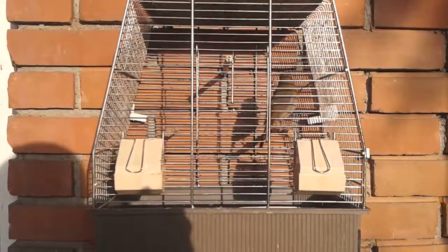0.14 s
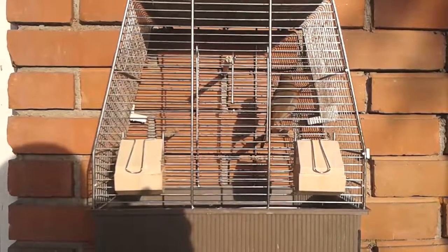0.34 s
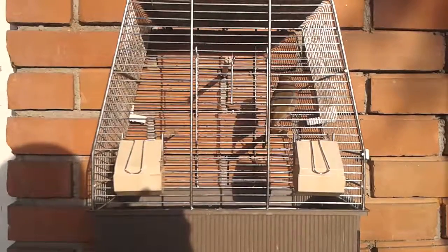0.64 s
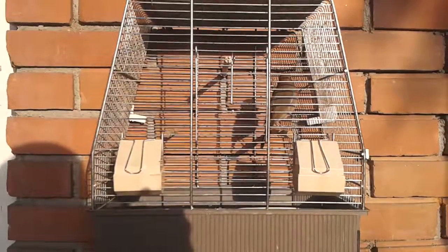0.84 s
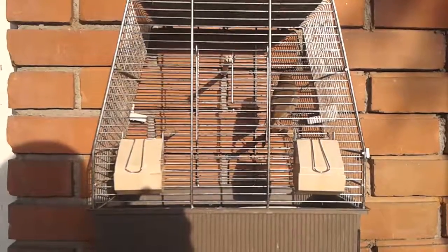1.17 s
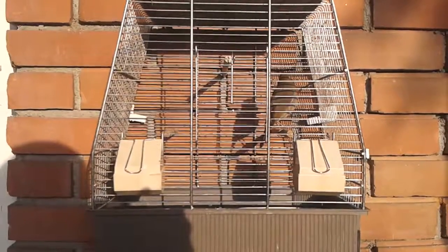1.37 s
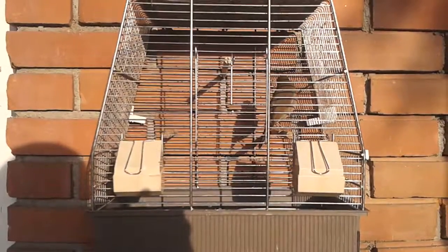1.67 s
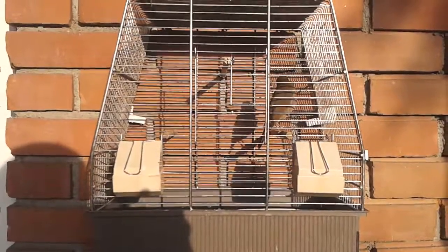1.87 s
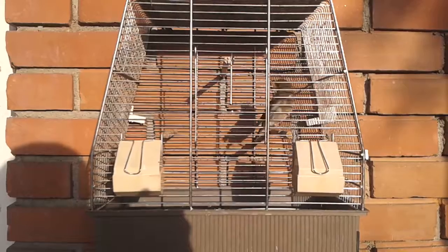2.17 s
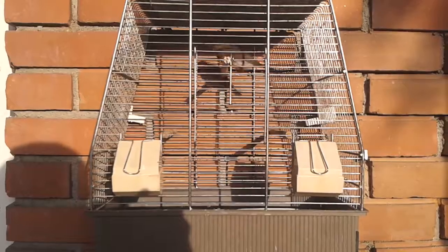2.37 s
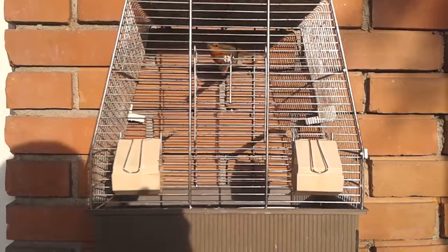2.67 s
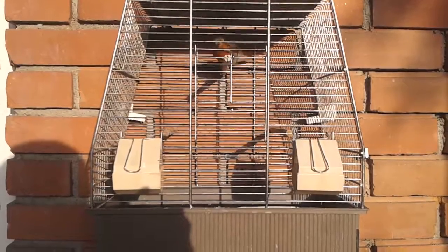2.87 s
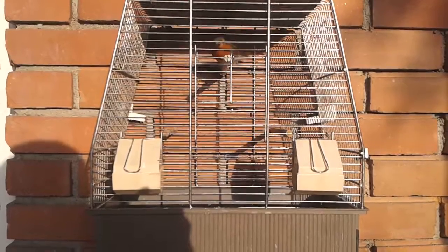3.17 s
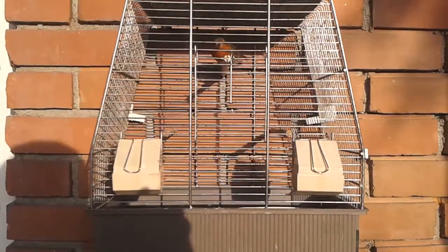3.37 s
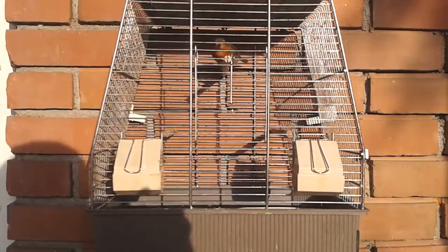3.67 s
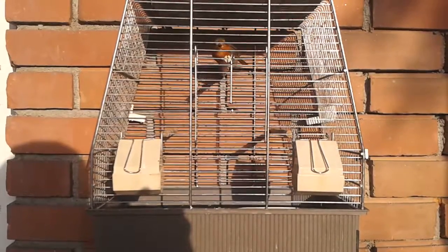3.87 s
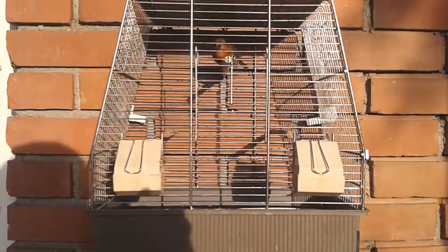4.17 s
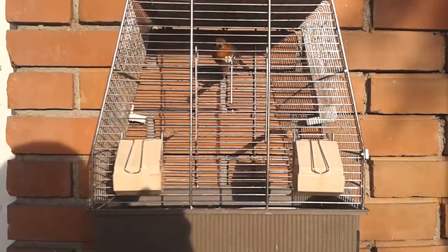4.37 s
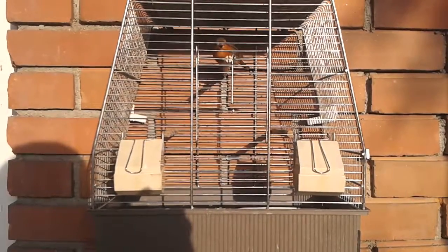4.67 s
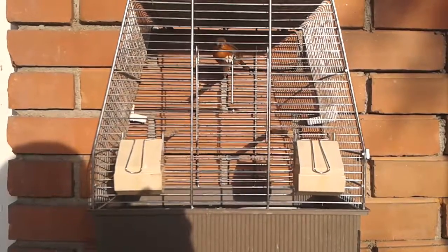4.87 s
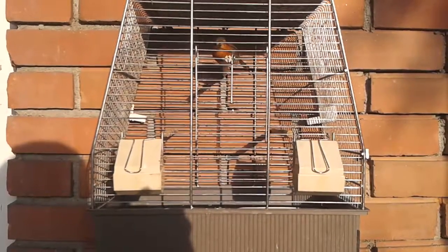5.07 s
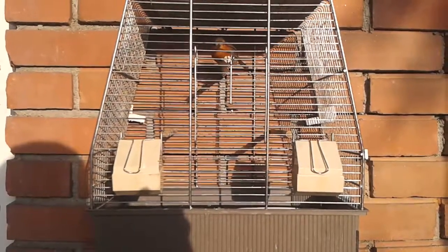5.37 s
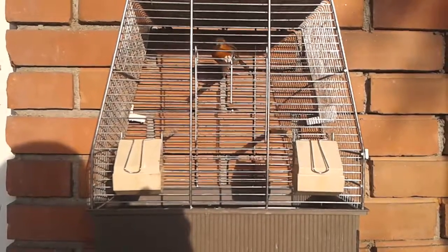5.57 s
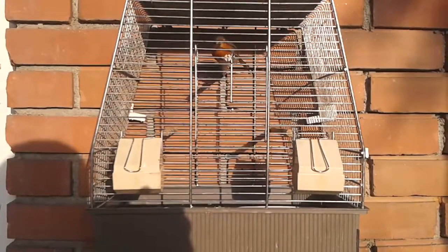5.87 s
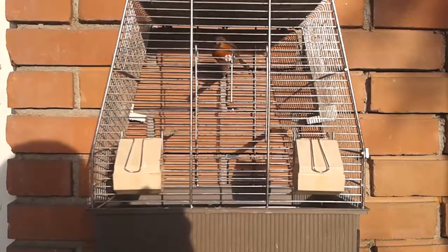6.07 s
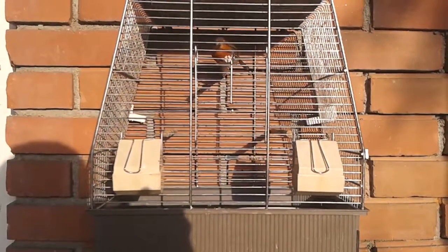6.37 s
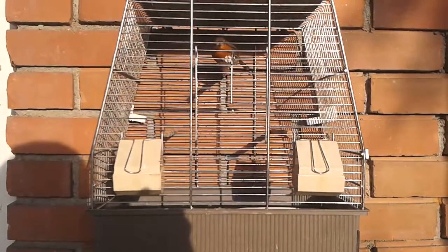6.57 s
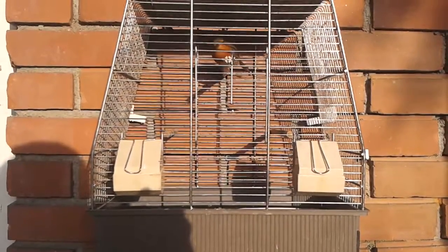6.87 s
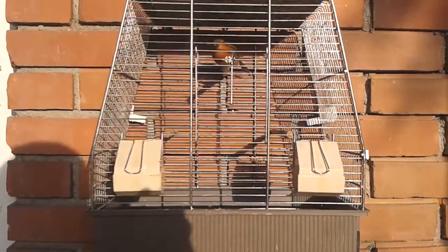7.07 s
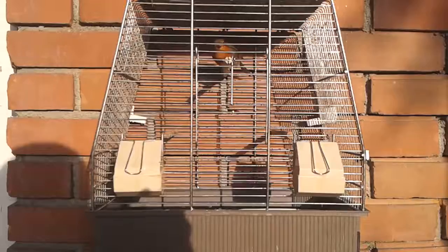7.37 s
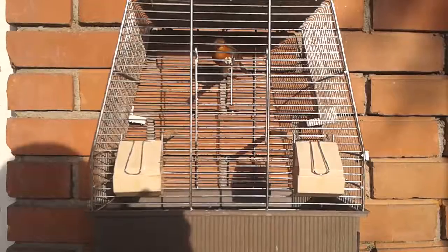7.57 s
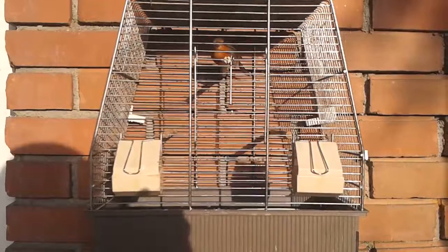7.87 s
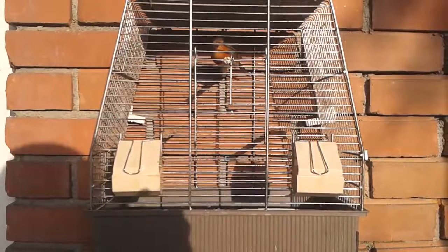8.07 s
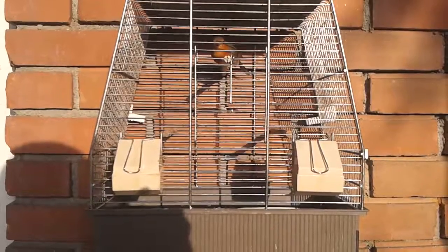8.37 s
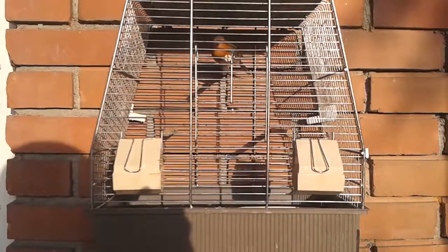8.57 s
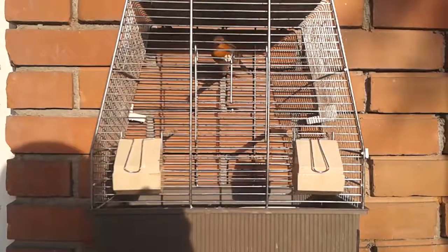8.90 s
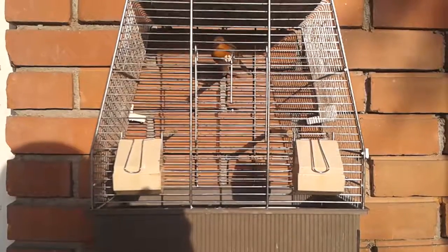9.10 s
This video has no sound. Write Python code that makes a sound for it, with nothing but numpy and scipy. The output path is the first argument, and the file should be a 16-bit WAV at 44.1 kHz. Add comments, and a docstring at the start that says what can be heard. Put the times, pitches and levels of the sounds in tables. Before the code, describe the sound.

A caged robin sings close to the microphone in a brick-walled yard. From 0 to 1.3 s it pours out rapid flicked chips, gliding slurs, a thin high arch around 0.6 s and bright barks near 0.8 s, then trails off softly. A pause follows, with dull distant traffic, a faint wavering engine drone and far, echo-blurred bird whistles around 1.6 and 2.5 s. At 3.1 s a very thin high whistle leads to the second phrase, 3.6 to 5 s: loud rasping barks, slightly overloaded, rough upward whips, a long falling whistle and a quiet dip. The far bird answers faintly at 5.3 and 6.4 s. Another thin lead-in at 6.9 s opens the last phrase: brisk chips and double notes from 7.3 s, then winding two-voiced whistles from 8.3 s, ending on a rising note about 9.2 s. A weak two-tone car horn sounds far off from 8.9 s.

```python
"""A robin in a wire cage on a brick wall sings three phrases close to the microphone, two led in by a
thin high whistle. The two sides of its syrinx make gliding whistles, often overlapping: chips, barks,
whips, slurs and long notes. Wall and yard throw them back, and the loudest overload the input.
Behind it another bird whistles through a blur of echoes, and filtered noise makes distant traffic.
A droning engine, low hums and, at the end, a far two-tone car horn are sums of wavering tones."""
import sys
import numpy as np
from scipy import signal
from scipy.fft import rfft, irfft
from scipy.io import wavfile

SR = 44100
rng = np.random.default_rng(int(sys.argv[2]) if len(sys.argv) > 2 else 0)


def transcribe(signal):
    """Save signal, clipped to [-1, 1], as a 16-bit WAV file at the path in sys.argv[1]."""
    frames = np.atleast_2d(signal).T
    limited = np.clip(frames, -1, 1)
    pcm = np.round(limited * 32767).astype(np.int16)
    wavfile.write(sys.argv[1], SR, pcm)


N = 407484
TIME = np.arange(N) / SR
TOP_HZ = 16000

# What the throat lets out of an overtone. Each row: overtone pitch in Hz, level against the note in dB.
THROAT_LEVELS = [(5000, -17.5), (6300, -32), (7400, -43), (10000, -44.5), (12500, -46), (16000, -53.5)]
# Flicks, a soft foot that hooks upward through a sharp peak. Each row: start in seconds, time to the
# peak in seconds, pitch in Hz, pitch at the peak in Hz, peak level in dB.
FLICK_NOTES = [(0.125, 0.014, 3350, 3717, -5), (.294, .012, 3307, 3686, -13),
               (.367, 0.015, 3283, 3900, -7.5), (.426, 0.013, 3510, 3607, -8.5),
               (.493, 0.014, 3234, 3860, -6), (1.195, 0.018, 3090, 3670, -25.5),
               (3.617, 0.014, 3112, 3388, -19.5), (8.096, 0.014, 3200, 3610, -11),
               (8.713, .013, 3170, 3300, -30)]
# Scoops, the U-shaped chips of the last phrase. Each row: start in seconds, length in seconds,
# pitch near the lowest point in Hz, middle level in dB, swell in dB (below zero it sags).
SCOOP_NOTES = [(7.331, 0.019, 3593, -11.5, 6.5), (7.475, 0.013, 3345, -11, 8),
               (7.535, 0.016, 3312, -12, -14), (7.595, 0.013, 3370, -5.5, 8.5),
               (7.666, 0.012, 3360, -14.5, -5), (7.747, 0.018, 3306, -9, -3.5),
               (7.811, 0.01, 3330, -6.5, 19), (7.877, 0.015, 3370, -9.5, -10.5),
               (7.937, 0.013, 3450, -5.5, 3), (8.032, 0.013, 3350, -10.5, -8.5),
               (8.185, 0.015, 3210, -24, 8)]
# Strokes, a quick drop onto a pitch. Each row: start in seconds, length in seconds,
# landing pitch in Hz, middle level in dB, swell in dB.
STROKE_NOTES = [(.06, .011, 3450, -7.5, 20), (.754, .011, 5380, -18.5, 0.5), (.774, .01, 4900, -8, 13),
                (.828, 0.014, 4930, -16, 16), (1.064, .007, 3180, -31, 17), (4.084, 0.0061, 3476, -7, 6),
                (4.092, 0.0035, 3110, -6, -19), (4.17, .008, 4150, -18.5, 13),
                (4.183, .011, 3700, -11.5, 24), (4.197, 0.012, 3370, -13, 16),
                (4.783, .011, 3230, -16.5, 5)]
# Barks, a clean head that breaks into a sagging rasp. Each row: start in seconds, head in seconds,
# tail in seconds, first pitch in Hz, pitch at the break in Hz, last pitch in Hz, peak level in dB,
# swell of the head in dB.
BARK_NOTES = [(0, 0.0015, 0.025, 3850, 3794, 3540, -10, 6), (.783, .018, 0.0086, 5000, 5290, 4940, -2.5, 7),
              (0.839, 0.012, 0.0077, 5170, 5250, 4830, -2.5, 4.5),
              (3.666, 0.011, 0.024, 3327, 3770, 3546, -5, 11),
              (3.748, 0.022, 0.022, 3455, 3810, 3550, 1, 11), (3.848, .019, 0.032, 3837, 4022, 3470, 0, 6),
              (3.958, 0.014, .015, 3716, 3804, 3360, 0, 0.5),
              (4.298, 0.006, 0.033, 3910, 3734, 3425, -2, 3.5)]
# Whips, a rough leap to a high note that fades.
# Each row: start in seconds, length in seconds, level of the leap in dB.
WHIP_NOTES = [(4.412, 0.058, -6.5), (4.538, 0.04, -14.5), (4.596, 0.059, -15)]
# Chords, one side sings and the other joins above it. Each row: start in seconds, length of the low
# note in seconds, low pitch in Hz, its peak level in dB, high pitch in Hz, its peak level in dB.
CHORD_NOTES = [(7.374, 0.015, 3733, -6.5, 5070, -18), (7.416, 0.035, 4450, -6.5, 5760, -26),
               (7.692, 0.026, 4395, -4.5, 5730, -16), (7.972, 0.024, 4233, -6.5, 5236, -16)]
# Slurs, easing from one pitch to another. Each row: start in seconds, length in seconds,
# first pitch in Hz, last pitch in Hz, middle level in dB, swell in dB, rasp from 0 to 1.
SLUR_NOTES = [(0.065, 0.097, 3198, 3080, -20, -12.5, 0.1), (.138, 0.081, 3390, 2900, -21, -7, 0.23),
              (0.157, 0.0256, 6320, 5940, -35.5, -2.5, 0.06), (.2, .011, 3620, 3800, -20, 3, .5),
              (.214, .018, 3760, 3250, -18, -3, .7), (0.242, 0.043, 3000, 2417, -24.5, 6, 0.02),
              (.385, .029, 3755, 3954, -18, 11.5, 0.51), (.593, 0.042, 4300, 5046, -30, -5.5, 0.6),
              (0.692, 0.037, 8530, 7630, -37.5, 22, 1), (0.704, .016, 7300, 5300, -19.5, -6.5, 0.9),
              (0.717, .02, 5340, 3780, -29.5, 0.5, .6), (0.731, .024, 6430, 7100, -24.5, -2.5, 0.2),
              (.922, 0.059, 5700, 6310, -25, -15, 0.06), (1.069, .014, 3110, 3220, -32.5, -7, .4),
              (1.082, .031, 3240, 3190, -25, -8, .05), (1.109, .015, 3680, 3680, -29.5, 9, .6),
              (1.14, .032, 3220, 3130, -36.5, -3, .5), (1.166, .021, 3650, 3880, -32.5, -4, .2),
              (1.243, .021, 2580, 2450, -38.5, -6, .2), (1.258, .027, 2990, 3350, -33, 6, .7),
              (1.266, .04, 2616, 2720, -40, 0, .6), (1.304, .011, 2760, 2420, -42, -4, .2),
              (3.562, 0.08, 2420, 2900, -40.5, 10, 0.42), (3.574, .016, 3200, 3650, -22, 19.5, .03),
              (3.585, .017, 3600, 3800, -13.5, -4.5, .05), (4.07, 0.027, 4550, 6030, -31.5, -15, 1),
              (4.076, 0.043, 2690, 2580, -35, -10.5, 1), (4.176, 0.021, 4200, 6900, -32, -19.5, 0.7),
              (4.176, 0.019, 1860, 3480, -31, 18.5, 1), (4.267, .026, 4220, 4550, -20, 14, .6),
              (4.277, .035, 5010, 4400, -27.5, -3.5, .9), (4.288, .016, 4435, 3950, -14.5, 7, .6),
              (4.653, 0.062, 5115, 4698, -12, 10, 0.22), (4.717, 0.076, 4683, 4746, -29.5, -20, 0),
              (7.323, 0.0074, 3340, 4200, -21.5, 4, 0.1), (7.53, 0.011, 4730, 5120, -11, -1.5, 0.05),
              (7.581, 0.017, 2380, 2560, -39, 19.5, 1), (7.653, .025, 4540, 4960, -10, -4, .11),
              (7.71, .02, 4250, 4350, -17, 25, 0.83), (7.849, 0.017, 2470, 2360, -36, 3.5, 1),
              (8.566, 0.058, 4040, 3860, -37.5, 32.5, .07), (8.734, 0.035, 3790, 3925, -26, -10, .07),
              (8.771, 0.017, 3410, 3330, -26.5, -12.5, 0.1), (8.846, 0.03, 3840, 6230, -34.5, -2, .6),
              (8.852, 0.042, 2404, 3730, -25.5, 25.5, 0.8), (9.014, 0.033, 2895, 3898, -14, 21, 0.47),
              (9.055, 0.045, 5110, 5240, -26, -14.5, 0.12)]
# Long whistles. Each row of a curve: time in seconds, pitch in Hz, level in dB before the shared boost.
# Lead-ins, upper voice and lower voice hold two curves each; the others are one curve.
HIGH_ARCH_CURVE = [(0.603, 7400, -42), (0.617, 7570, -35), (0.629, 8160, -38.5), (0.639, 7750, -37.5),
                   (0.649, 7580, -27.5), (0.681, 7560, -27), (0.7, 7020, -34)]
LEAD_IN_CURVES = [
    [(3.14, 8490, -58), (3.15, 8530, -43.5), (3.24, 8530, -58.5), (3.292, 7940, -44), (3.31, 8230, -72),
     (3.39, 8030, -52)],
    [(6.865, 8030, -52), (6.941, 8180, -48.5), (7.045, 7880, -50.5), (7.057, 7880, -42.5),
     (7.167, 8100, -51), (7.195, 7840, -51.5)],
]
CLOSING_DIP_CURVE = [(4.795, 3220, -27), (4.85, 3070, -38.5), (4.896, 3295, -38.5), (4.921, 3346, -25.5),
                     (4.956, 3480, -30.5)]
UPPER_VOICE_CURVES = [
    [(8.32, 4020, -30), (8.338, 3990, -25), (8.354, 3960, -29.5), (8.404, 4300, -31), (8.454, 4140, -32),
     (8.472, 3964, -20), (8.535, 4060, -23)],
    [(8.885, 3810, -25.5), (8.927, 4000, -20.5), (8.937, 4385, -27), (8.943, 4330, -20.5),
     (8.953, 3830, -30), (8.967, 4135, -25.5), (8.97, 4030, -23)],
]
LOWER_VOICE_CURVES = [
    [(8.322, 2475, -36.5), (8.364, 2557, -42.5), (8.398, 2434, -51.5), (8.428, 2490, -42),
     (8.45, 2550, -49)],
    [(8.54, 2440, -40.5), (8.57, 2670, -49.5), (8.582, 2473, -38.5), (8.624, 2597, -50.5),
     (8.635, 2640, -32)],
]
LAST_RISE_CURVE = [(9.155, 3224, -26.5), (9.181, 3918, -26), (9.211, 3874, -27.5), (9.24, 3810, -20)]
# Nearby surfaces that reflect the song. Each row: delay in seconds, level in dB.
NEAR_REFLECTIONS = [(.0017, -20), (.0046, -13), (.0093, -14.5)]
# The far bird's loose calls, falling and levelling off. Each row: start in seconds, length in seconds,
# first pitch in Hz, last pitch in Hz, level in dB before trim and echoes.
FAR_CALLS = [(1.621, .14, 3400, 2520, -63), (2.751, 0.17, 4340, 2490, -64), (3.19, 0.17, 3300, 2390, -58),
             (3.21, .08, 4700, 4330, -59), (5.265, 0.064, 5290, 4500, -58),
             (5.377, 0.07, 5500, 2890, -55.5), (6.899, .19, 3470, 2430, -61)]
# The far bird's song, sung twice. Each row: start in seconds, level in dB before trim and echoes.
FAR_SONG_STARTS = [(2.492, -51.5), (6.361, -51)]
# Quick notes of that song. Each row: delay in seconds, first pitch in Hz, last pitch in Hz,
# level against the song in dB.
FAR_SONG_NOTES = [(0, 3770, 4900, -2), (.03, 5100, 4100, -4), (.055, 4260, 3280, -2.5),
                  (0.079, 3210, 4200, 0.5), (.112, 4300, 3300, -1), (0.147, 3280, 4180, 3)]
# Car horn, one row for each of its two tones. Each row: pitch in Hz, then the levels of the first
# seven harmonics in dB before the fading.
HORN_TONES = [(346, -56, -57, -62.5, -70.5, -71.5, -67, -70), (448, -49, -63, -67.5, -72, -66, -62, -57)]
# Loudness of the whole horn over time. Each row: time in seconds, change in level in dB.
HORN_FADER = [(8.9, -49), (8.94, -1.5), (9.0, 7), (9.07, 4), (9.12, -0.5), (9.24, -4.5)]
# Far engine. Each row: time in seconds, pitch of its strongest line in Hz, level in dB before trim.
ENGINE_COURSE = [(0, 156, -75.5), (1.85, 164, -64), (2.1, 166.4, -60), (3.1, 172.8, -54), (3.6, 171, -69),
                 (4.1, 178.5, -57.5), (5.1, 173.6, -58), (6.9, 179.9, -68), (7.35, 180.5, -58),
                 (7.75, 180.6, -64), (8.15, 177.6, -54.5), (9.2, 181.7, -67)]
# Its lines; the strongest is the third multiple. Each row: multiple of the firing rate, level in dB.
ENGINE_HARMONICS = [(1, -14.5), (3, 1), (4, -10.5), (5, -9.5)]
# Faint low hums. Each row: start in seconds, length in seconds, pitch in Hz, level in dB.
HUM_TONES = [(1.054, 1.09, 79.4, -65.5), (2.001, 1.43, 249, -61.5), (4.6, 2.25, 58.07, -66)]
# Tone colour of distant traffic. Each row: frequency in Hz, relative level per Hz in dB.
TRAFFIC_COLOUR = [(22, -32.5), (60, -10.5), (110, -15), (230, -9.5), (380, -14.5), (650, -15.5),
                  (1400, -19.5), (1700, -20), (2700, -28.5), (6200, -37), (16000, -42)]
# Level of the background noise's middle range, higher while the robin sings.
# Each row: time in seconds, level in dB.
BACKGROUND_COURSE = [(0, -56.5), (.9, -56), (1.5, -63), (2.7, -58), (3.4, -60), (4.3, -53.5), (5.2, -62),
                     (7.1, -60), (7.6, -53.5), (9.2, -59)]


def undb(db):
    """Decibels to gain."""
    return 10 ** (np.asarray(db) / 20)


def unit(x):
    """Scale to rms 1."""
    return x / np.sqrt(np.mean(x ** 2))


def curves(rows):
    """The columns of a table that starts with time, joined by straight lines."""
    s, *columns = np.transpose(rows)
    return [np.interp(TIME, s, column) for column in columns]


def band(x, lo_hz, hi_hz, order=2):
    """Keep the frequencies between two limits."""
    limits = [lo_hz, min(hi_hz, SR / 2 - 100)]
    return signal.sosfilt(signal.butter(order, limits, "band", fs=SR, output="sos"), x)


def wander(rate_hz):
    """Smooth random motion of spread 1, mostly slower than the given rate."""
    hz = np.arange(N // 2 + 1) * SR / N
    spectrum = rfft(rng.standard_normal(N))
    return unit(irfft(spectrum * np.exp(-(hz / rate_hz) ** 2), N))


def turns(hz):
    """Add up a changing pitch into the phase of a tone."""
    return 2 * np.pi * np.cumsum(hz) / SR


def add(out, start_s, sound):
    """Mix a sound in at a given time."""
    i = max(int(start_s * SR), 0)
    out[i:i + len(sound)] += sound[:max(N - i, 0)]


def progress(length_s):
    """Runs from 0 to 1 over a note."""
    return np.linspace(0, 1, max(int(length_s * SR), 2))


def ease(length_s, from_hz, to_hz, time_constants=2.3):
    """A pitch that moves fast at first and slows toward its goal."""
    share = np.expm1(-time_constants * progress(length_s)) / np.expm1(-time_constants)
    return from_hz + (to_hz - from_hz) * share


def glide(length_s, pitch_hz, shape):
    """A smooth bend through three ratios of a pitch: start, middle and end."""
    bend = np.polyfit([0, .5, 1], shape, 2)
    return pitch_hz * np.polyval(bend, progress(length_s))


def swell(length_s, db, swell_db):
    """A level in dB that changes evenly through its middle value."""
    return db + swell_db * (progress(length_s) - .5)


def robin(ramp_s=0.0023, ramp_share=0.063, waver=0.0028, rasp_pitch=.045, rasp_db=2.0, hiss_db=-34,
          octave_db=-37, gape_hz=(4915, 5600), beat_hz=290, beat_spread=0.22, strand_db=-6):
    """Nearly pure whistles glide; rasp shakes them, adds a beating strand and lets air hiss through."""
    out = np.zeros(N)
    drift, shake, flutter = wander(150), wander(440), wander(240)
    air = unit(band(rng.standard_normal(N), 2500, TOP_HZ))
    beat = turns(beat_hz * (1 + beat_spread * wander(60)))
    throat_hz, throat_db = np.transpose(THROAT_LEVELS)
    for start, hz, db, rasp in [*chips(), *barks(), *whips(), *chords(), *slurs(), *whistles()]:
        u = np.linspace(0, 1, len(hz))
        at = np.minimum(max(int(start * SR), 0) + np.arange(len(u)), N - 1)
        hz = hz * (1 + waver * drift[at] + rasp * rasp_pitch * shake[at])
        phase = turns(hz)
        # the air valve opens and shuts smoothly, while the pressure swells or sags through the note
        ramp = min(ramp_s * SR / len(u) + ramp_share, .5)
        valve = np.sin(np.pi / 2 * np.minimum(np.minimum(u, 1 - u) / ramp, 1)) ** 2
        pressure = undb(db + rasp * rasp_db * flutter[at])
        overtones = 0
        for k in range(2, 5):
            if k * np.median(hz) < SR / 2:
                overtones = overtones + undb(np.interp(k * hz, throat_hz, throat_db)) * np.sin(k * phase)
        # the beak gapes on high notes and lets more of the octave out
        gape = np.interp(hz, gape_hz, [0, 1])
        overtones = overtones + undb(octave_db) * gape * np.sin(2 * phase)
        # in a harsh note the two sides fall out of step and a second strand sounds just below
        strand = undb(strand_db) * np.sin(phase - beat[at])
        harshness = rasp ** 2 * (strand + undb(hiss_db) * air[at])
        add(out, start, valve * pressure * (np.sin(phase) + overtones + harshness))
    return out


def chips(foot_db=13.5, peak_s=0.0026, hook_s=.004, overshoot_s=0.0033, flick_rasp=0.55):
    """Flicks, scoops and strokes, one quick bend each, as (start s, pitch Hz, level dB, rasp)."""
    for start, rise, hz, peak_hz, db in FLICK_NOTES:
        length = rise + overshoot_s
        t = length * progress(length) - rise  # zero at the peak
        hook = np.exp(t / hook_s)
        peak = 1 / (1 + (t / peak_s) ** 2)
        yield start, hz + (peak_hz - hz) * hook, db - foot_db * (1 - peak), flick_rasp
    scoops = SCOOP_NOTES, (1.1, 0.99, 1.19), 0.087  # notes, pitch ratios, rasp
    strokes = STROKE_NOTES, (1.437, 1.1, 1), 0.38
    for rows, shape, rasp in (scoops, strokes):
        for start, length, hz, db, swell_db in rows:
            yield start, glide(length, hz, shape), swell(length, db, swell_db), rasp


def barks(overlap_s=.002, head_rasp=0.12, tail_db=(-1.5, -16), tail_rasp=0.69):
    """Pressure builds as the pitch moves until the whistle breaks up, then both sag."""
    for start, head, tail, first_hz, top_hz, last_hz, db, swell_db in BARK_NOTES:
        u = progress(head)
        yield start, first_hz + (top_hz - first_hz) * u, db - swell_db * (1 - u) ** 2, head_rasp
        tail_level_db = db + np.interp(progress(tail), [0, 1], tail_db)
        yield start + head - overlap_s, ease(tail, top_hz, last_hz), tail_level_db, tail_rasp


def whips(low_hz=2900, high_hz=6300, fall_back_hz=5200, leap_s=0.0082, leap_rasp=0.91,
          settle_s=0.0083, hold_db=-4, fade_db=7, hold_rasp=0.04):
    """A rough leap upward, then the pitch falls back a little and climbs to a clean, fading note."""
    for start, length, db in WHIP_NOTES:
        yield start, np.interp(progress(leap_s), [0, 1], [low_hz, high_hz]), db, leap_rasp
        hold_s = length - leap_s
        u = progress(hold_s)
        to_go = np.exp(-u * hold_s / settle_s)
        hz = high_hz + (fall_back_hz - high_hz) * to_go
        yield start + leap_s, hz, db + hold_db - fade_db * u, hold_rasp


def chords(arch_db=7, join_share=0.38, high_share=0.82, shape=(1, 0.98, 1.05), rasp=0.19):
    """Two notes that swell and fade, the higher one entering partway through the lower."""
    for start, length, low_hz, low_db, high_hz, high_db in CHORD_NOTES:
        low = start, length, low_hz, low_db
        high = start + join_share * length, high_share * length, high_hz, high_db
        for at, span, hz, db in (low, high):
            arch = arch_db * (2 * progress(span) - 1) ** 2
            yield at, glide(span, hz, shape), db - arch, rasp


def slurs():
    """Notes that ease from one pitch to another while the air pressure changes evenly in dB."""
    for start, length, from_hz, to_hz, db, swell_db, rasp in SLUR_NOTES:
        yield start, ease(length, from_hz, to_hz), swell(length, db, swell_db), rasp


def whistles(boost_db=3.5, rasp=0.084, fray_rasp=.35):
    """Long, nearly clean notes that wind in pitch; the thin lead-ins fray toward their end."""
    clean = [HIGH_ARCH_CURVE, CLOSING_DIP_CURVE, *UPPER_VOICE_CURVES, *LOWER_VOICE_CURVES, LAST_RISE_CURVE]
    for notes, fray in (clean, 0), (LEAD_IN_CURVES, fray_rasp):
        for rows in notes:
            s, hz, db = np.transpose(rows)
            length = s[-1] - s[0]
            u = progress(length)
            t = s[0] + length * u
            yield s[0], np.interp(t, s, hz), np.interp(t, s, db) + boost_db, rasp + fray * u ** 4


def couple(voice, difference_db=-15, sum_db=-19, sideband_db=-9, upper_db=-17):
    """Where both sides of the syrinx sound together, they shake each other into combination tones."""
    low = signal.hilbert(band(voice, 2200, 2750, order=6))
    high = signal.hilbert(band(voice, 3800, 4500, order=6))
    both = np.minimum(np.abs(low), np.abs(high))
    a, b = np.angle(low), np.angle(high)
    tones = undb(difference_db) * np.cos(b - a) + undb(sum_db) * np.cos(b + a)
    tones = tones + undb(sideband_db) * np.cos(3 * a - b) + undb(upper_db) * np.cos(2 * b - a)
    return voice + band(both * tones, 1400, 7000, order=4)


def yard(x, gap_s=0.0055, top_hz=7500, grain=2):
    """Close reflections off wall and cage, then scattered echoes with dulled treble and a faint far tail."""
    t = TIME[:SR // 2]
    response = np.zeros(len(t))
    response[0] = 1
    for delay_s, db in NEAR_REFLECTIONS:
        add(response, delay_s, undb([db]))
    # yard, then far tail: seconds to fall by 60 dB, and a level in dB that the scaling below cuts by 3
    for t60, db in (0.14, -10), (0.43, -26):
        # a few strong echoes stand out among many weak ones
        echoes = rng.standard_normal(len(t)) * rng.exponential(size=len(t)) ** grain
        decay = np.exp(-np.log(1000) * t / t60)
        tail = band(echoes * decay * (t > gap_s), 1000, top_hz)
        response = response + undb(db) * tail / np.sqrt(2 * np.sum(tail ** 2))
    return signal.fftconvolve(x, response)[:N]


def far_bird(t60=0.19, trim_db=-2, direct_db=-5, blur_db=-1, quaver=0.071,
             note_s=0.0196, held_s=.15, held_hz=4960, held_db=-15):
    """A short song of quick gliding whistles, and loose falling calls, blurred by houses on the way."""
    out, shake = np.zeros(N), wander(200)
    notes = [(start, ease(length, from_hz, to_hz), db) for start, length, from_hz, to_hz, db in FAR_CALLS]
    for start, db in FAR_SONG_STARTS:
        for delay, from_hz, to_hz, note_db in FAR_SONG_NOTES:
            hz = from_hz + (to_hz - from_hz) * progress(note_s)
            notes.append((start + delay, hz, db + note_db))
        # a thin note held above most of the song
        notes.append((start, np.full(int(held_s * SR), held_hz), db + held_db))
    for at, hz, db in notes:
        hz = hz * (1 + quaver * shake[int(at * SR):][:len(hz)])
        add(out, at, undb(db + trim_db) * signal.windows.tukey(len(hz)) * np.sin(turns(hz)))
    t = TIME[:SR // 2]
    blur = rng.standard_normal(len(t)) * np.exp(-np.log(1000) * t / t60)
    blurred = signal.fftconvolve(out, blur / np.sqrt(np.sum(blur ** 2)))[:N]
    return undb(direct_db) * out + undb(blur_db) * blurred


def horn(waver=.009, fading_db=3, blare_hz=(900, 1500), blare_db=-61):
    """Two horns about a fourth apart, with a rough blare; the long path makes each harmonic fade alone."""
    db, = curves(HORN_FADER)
    out = undb(blare_db) * unit(band(rng.standard_normal(N), *blare_hz))
    for hz, *harmonics in HORN_TONES:
        phase = turns(hz * (1 + waver * wander(28)))
        for k, harmonic_db in enumerate(harmonics, 1):
            out = out + np.sin(k * phase) * undb(harmonic_db + fading_db * wander(27))
    return np.sqrt(2) * out * undb(db)


def engine(trim_db=-1, waver=.008, throb_db=2):
    """A far engine drones on a few low harmonics of its firing rate that fade in and out."""
    hz, db = curves(ENGINE_COURSE)
    strongest = ENGINE_HARMONICS[1][0]
    firing_phase = turns(hz * (1 + waver * wander(12))) / strongest
    out = 0
    for k, line_db in ENGINE_HARMONICS:
        level = undb(db + line_db + trim_db + throb_db * wander(5.4))
        out = out + np.sin(round(k) * firing_phase) * level
    return np.sqrt(2) * out


def hums(fade_s=.2, waver=0.012, throb_db=2):
    """Low wavering tones in the distance, each fading in and out."""
    out = 0
    for start, length, hz, db in HUM_TONES:
        gate = np.clip(np.minimum(TIME - start, start + length - TIME) / fade_s, 0, 1)
        level = undb(db + throb_db * wander(6.3))
        out = out + gate * level * np.sin(turns(hz * (1 + waver * wander(9))))
    return np.sqrt(2) * out


def traffic(bass_follow=0.0993, treble_follow=1.0):
    """A dull background wash of filtered noise; its bass stays nearly steady, the rest rises in the song."""
    hz, db = np.transpose(TRAFFIC_COLOUR)
    bins = np.maximum(np.arange(N // 2 + 1) * SR / N, 1)
    colour = undb(np.interp(np.log(bins), np.log(hz), db))
    wash = irfft(rfft(rng.standard_normal(N)) * colour, N)
    # the level curve applies to the middle range
    spectrum = rfft(wash / np.std(band(wash, 480, 1350)))
    level_db, = curves(BACKGROUND_COURSE)
    calm_db = np.min(level_db)
    bass = 1 / (1 + (bins / 220) ** 4)
    treble = 1 / (1 + (2800 / bins) ** 4)
    out = 0
    for share, follow in (bass, bass_follow), (1 - bass - treble, 1), (treble, treble_follow):
        out = out + irfft(spectrum * share, N) * undb(calm_db + follow * (level_db - calm_db))
    return out


def scene():
    """The bird in its yard, over the far street."""
    song = yard(couple(robin()))
    return (song + far_bird() + horn() + engine() + hums() + traffic())[None]


def record(dry, overload=0.74):
    """The input flattens the loudest notes, which adds odd harmonics; the top is cut."""
    # twice the sample rate keeps the new harmonics from folding back
    fine = signal.resample_poly(dry, 2, 1, axis=1)
    fine = fine / (1 + (fine / overload) ** 8) ** (1 / 8)
    flat = signal.resample_poly(fine, 1, 2, axis=1)
    return signal.sosfiltfilt(signal.ellip(8, .1, 50, TOP_HZ, fs=SR, output="sos"), flat)


dry = scene()
out = record(dry)
transcribe(out)
```